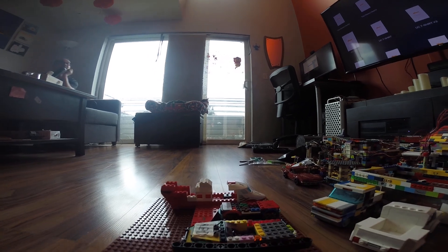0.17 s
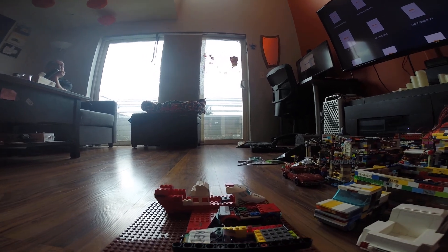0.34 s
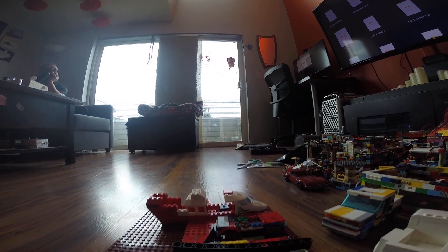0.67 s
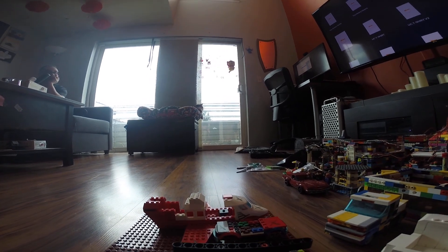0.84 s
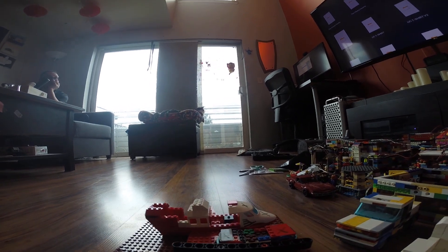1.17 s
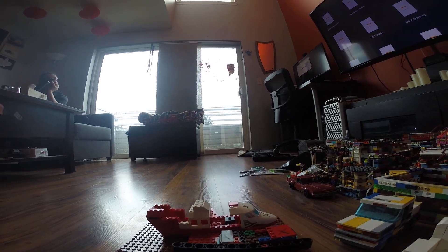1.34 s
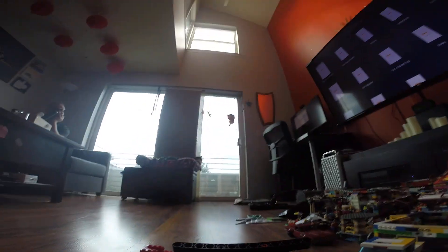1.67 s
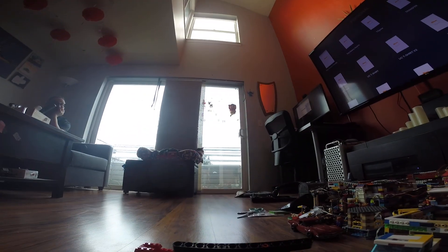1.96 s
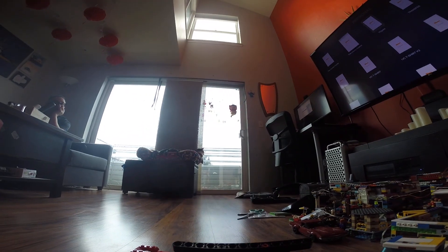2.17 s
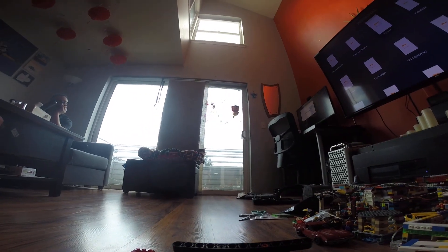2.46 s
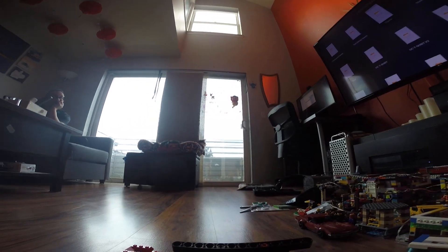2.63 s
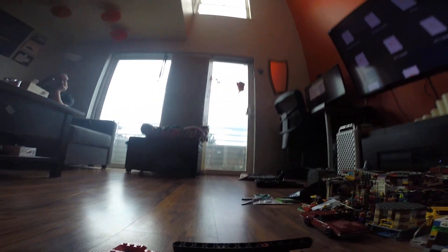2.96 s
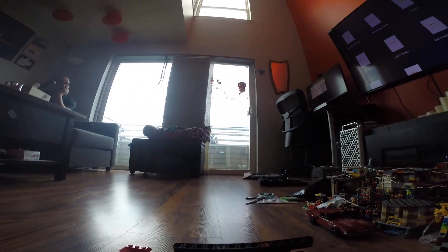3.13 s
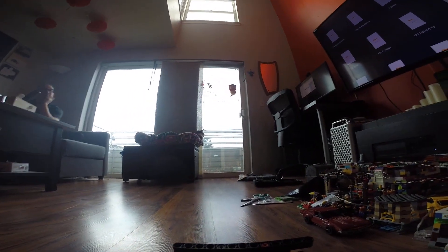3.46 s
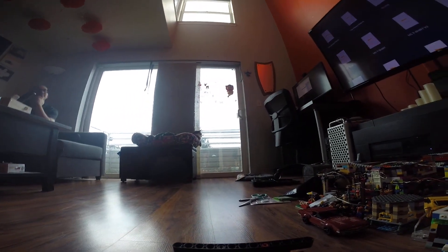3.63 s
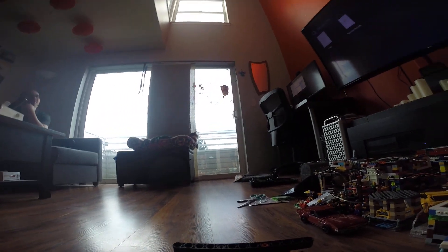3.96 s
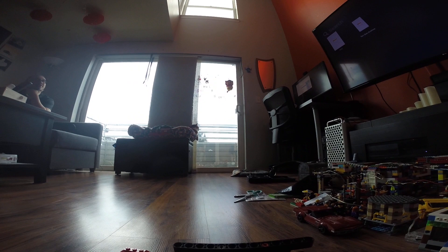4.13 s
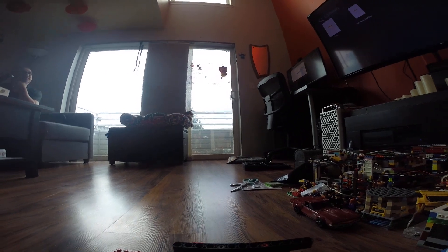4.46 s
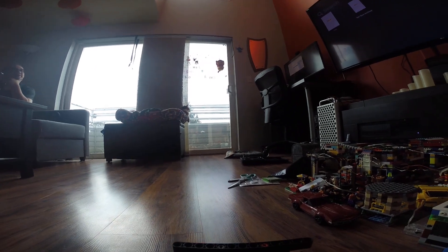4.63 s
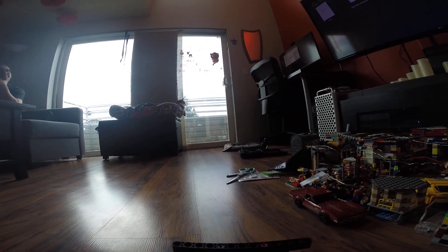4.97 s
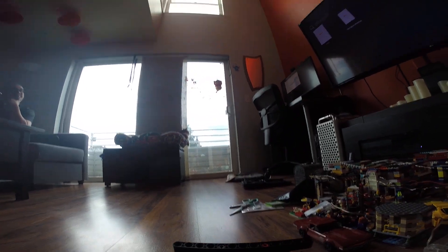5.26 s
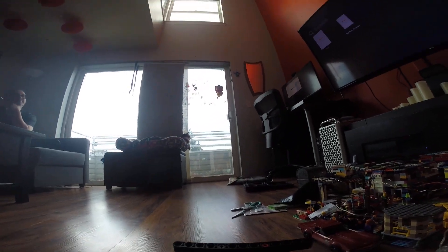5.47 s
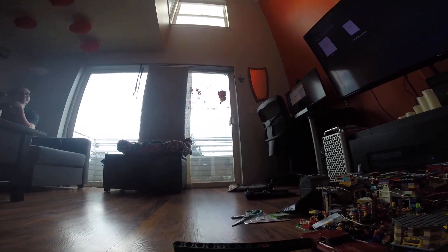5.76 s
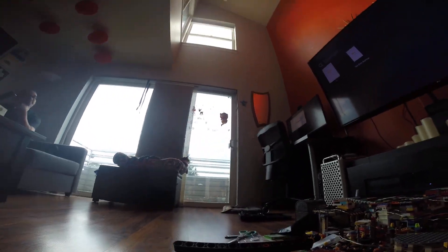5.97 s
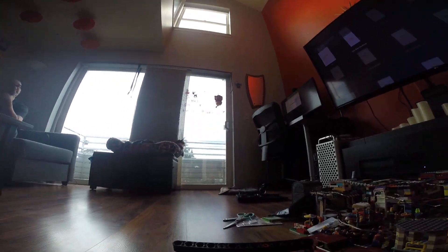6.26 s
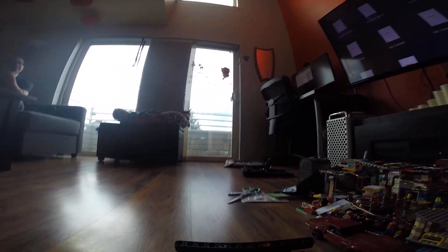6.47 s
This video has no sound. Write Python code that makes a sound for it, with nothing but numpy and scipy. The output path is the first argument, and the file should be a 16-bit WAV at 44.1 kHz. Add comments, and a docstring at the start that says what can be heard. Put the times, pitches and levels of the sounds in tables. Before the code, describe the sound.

Toy wheels rumble low on wooden boards while a plastic chassis knocks and loose bricks clack, with one hard jolt late.

```python
"""Wheels rumble on a wooden floor, very close: the microphone rides on a toy truck of plastic bricks,
pushed in fits and starts. Rolling sets the chassis rattling; the frame knocks, the deck thumps, loose
bricks clack and bounce, and now and then a wheel scrapes. The living room answers faintly over a low
hiss, and the recorder's limiter ducks after the hardest jolt, near the end."""
import sys
import numpy as np
from scipy import signal
from scipy.fft import rfft, irfft
from scipy.io import wavfile
from scipy.ndimage import uniform_filter1d, minimum_filter1d

SR = 44100
rng = np.random.default_rng(int(sys.argv[2]) if len(sys.argv) > 2 else 0)


def wav_record(signal):
    """Record a signal, one row per channel, as 16-bit PCM in the file named by sys.argv[1]."""
    frames = np.transpose(np.atleast_2d(signal))
    bounded = np.clip(frames, -1, 1)
    # unit amplitude maps onto the largest positive 16-bit level
    quanta = np.round(bounded * 32767).astype(np.int16)
    wavfile.write(sys.argv[1], SR, quanta)


N = 291060
TIME = np.arange(N) / SR
HIT_TIME = TIME[:SR // 4]

# resonances of the chassis: (frequency [Hz], width [Hz], relative level [dB])
CHASSIS_MODES = [(190, 65, -1.5), (330, 360, -4.5), (471, 277, 2.5), (654, 450, -0.5), (879, 260, -2),
                 (1081, 77, 3), (1141, 192, 0.5), (1568, 155, -3.5), (1946, 260, -12.5), (2315, 207, -6.5),
                 (2840, 200, -14.5), (3248, 168, -11.5), (3750, 1060, -29), (4290, 420, -28),
                 (4820, 600, -30.5), (6460, 1700, -52)]
# resonances of a loose brick: (frequency [Hz], width [Hz], relative level [dB])
BRICK_MODES = [(1000, 820, -1), (1444, 130, 3), (2041, 100, 10.5), (2448, 120, 9), (2700, 180, 0),
               (3330, 52, -2), (3794, 110, -7.5), (4450, 3900, -18), (7050, 2000, -25)]


def undb(db):
    """Decibels to gain."""
    return 10 ** (np.asarray(db) / 20)


def unit(x):
    """Scale to an rms of 1."""
    return x / np.sqrt(np.mean(x ** 2))


def add(track, s, hit, db):
    """Mix in a hit at time s, with its loudest 4 ms at the given level."""
    start = max(int(s * SR), 0)
    loudest = np.sqrt(uniform_filter1d(hit ** 2, size=176, mode="constant").max())
    track[start:start + len(hit)] += hit[:N - start] * undb(db) / loudest


def convolve(x, response):
    """Play x through a body or a room."""
    return signal.fftconvolve(x, response)[:len(x)]


def noise(spectrum):
    """Noise of rms 1, shaped by (frequency [Hz], relative level [dB]) points."""
    hz, db = np.transpose(spectrum)
    gain = undb(np.interp(np.log(np.fft.rfftfreq(N, 1 / SR) + 1), np.log(hz), db))
    return unit(irfft(rfft(rng.standard_normal(N)) * gain, N))


def waver(count, smooth_samples):
    """A smooth random wobble of rms 1."""
    return unit(uniform_filter1d(rng.standard_normal(count), size=smooth_samples))


def surge(s, hold_s, rise_s, settle_s):
    """An envelope that rises to 1 at time s, holds and dies away."""
    return np.exp(-np.maximum(s - TIME, 0) / rise_s - np.maximum(TIME - s - hold_s, 0) / settle_s)


def ring(modes, scatter_db=0, tilt_db=0, pitch=1):
    """Impulse response of a body; scatter weights its modes anew, as the place of contact does."""
    hz, width, db = np.transpose(modes)
    gain = width * undb(db + tilt_db + scatter_db * rng.standard_normal(len(hz)))
    sign = (-1) ** np.arange(len(hz))
    decays = np.exp(-np.pi * np.outer(width, HIT_TIME))
    tones = np.sin(2 * np.pi * np.outer(hz * pitch, HIT_TIME))
    return (sign * gain) @ (decays * tones)


def contacts(count, per_s, spread_db):
    """Random tiny collisions, most weak and a few strong."""
    size = undb(spread_db * np.minimum(rng.exponential(size=count), 4))
    return unit(size * rng.choice([-1, 1], count) * (rng.random(count) < per_s / SR))


def blow(chatter_s, chatter_gain, contact_hz=6000):
    """One push, then dying chatter as the joints settle; plastic gives, which rounds each contact."""
    settling = np.exp(-HIT_TIME / max(chatter_s, 1 / SR))
    force = chatter_gain * contacts(len(HIT_TIME), per_s=2300, spread_db=4.5) * settling
    force[0] += 1
    return signal.sosfilt(signal.butter(4, contact_hz, fs=SR, output="sos"), force)


def noise_floor(hiss_db=-62, whine_hz=13474, whine_db=-85):
    """A faint steady hiss and a thin whine lie behind everything."""
    # the hiss: (frequency [Hz], relative level [dB])
    spectrum = [(100, 19), (4000, 11), (6000, 4.5), (9000, 2), (15000, -9)]
    return noise(spectrum) * undb(hiss_db) + np.sin(2 * np.pi * whine_hz * TIME) * undb(whine_db)


def buzz(band_hz=(5600, 5760), pulses_per_s=24, db=-79):
    """A narrow high buzz from the electronics, pulsing evenly."""
    bandpass = signal.butter(2, band_hz, "bandpass", fs=SR, output="sos")
    band = signal.sosfilt(bandpass, rng.standard_normal(N))
    tone = np.cos(np.angle(signal.hilbert(band)))  # wandering pitch, even level
    pulses = np.maximum(np.sin(2 * np.pi * pulses_per_s * TIME), 0)
    return unit(tone * pulses) * undb(db)


def room(direct, t60_s=0.22, build_s=0.0026, gain_db=-20.5):
    """Walls and furniture reflect the truck, duller and far weaker than it is at the microphone."""
    t = TIME[:SR]
    tail = rng.standard_normal(SR) * undb(-60 * t / t60_s) * (1 - np.exp(-t / build_s))
    bandpass = signal.butter(1, [300, 5000], "bandpass", fs=SR, output="sos")
    tail = signal.sosfilt(bandpass, unit(tail) / np.sqrt(SR))
    return convolve(direct, tail) * undb(gain_db)


def high_hiss(s=5.87, db=-73):
    """A faint, thin high hiss swells just before the hardest jolt."""
    # the high hiss: (frequency [Hz], relative level [dB])
    spectrum = [(6500, -36), (9200, 10), (11500, -32)]
    return noise(spectrum) * undb(db) * surge(s, hold_s=0.115, rise_s=0.33, settle_s=0.0087)


def squeak(s=5.56, length_s=0.09, fundamental_hz=4340, db=-62):
    """A brief thin squeak, heard in its second and third harmonics; the pitch wavers."""
    hz = fundamental_hz * (1 + 0.0041 * waver(len(HIT_TIME), smooth_samples=100))
    phase = 2 * np.pi * np.cumsum(hz) / SR
    swell = np.sqrt(np.abs(np.sin(np.pi * np.minimum(HIT_TIME / length_s, 1))))
    out = np.zeros(N)
    add(out, s, swell * (np.sin(2 * phase) + 0.2 * np.sin(3 * phase)), db)
    return out


def scrapes(grit_db=2.0):
    """A wheel drags sideways on the boards, gripping and slipping unevenly."""
    # sideways drags: (time [s], hold [s], level [dB])
    drags = [(4.249, 0.045, -53), (5.284, 0.08, -53)]
    # wheel on wood: (frequency [Hz], relative level [dB])
    spectrum = [(500, -10), (1500, 8), (2400, 1.5), (5000, -12), (11000, -45)]
    grit = undb(grit_db * waver(N, smooth_samples=150))
    swell = sum(undb(db) * surge(s, hold_s, rise_s=0.032, settle_s=0.062) for s, hold_s, db in drags)
    return noise(spectrum) * grit * swell


def ticks():
    """A wheel drops over a seam or a crumb; the soft contact stirs only the lower chassis modes."""
    # wheel drops: (time [s], level [dB])
    drops = [(0.057, -37), (1.426, -45.5), (1.464, -41), (2.371, -39), (2.633, -35), (2.784, -39.5),
             (2.856, -45), (3.306, -46.5), (3.518, -45.5), (3.613, -40.5), (4.549, -37.5), (4.571, -36.5),
             (6.117, -40), (6.438, -36)]
    out = np.zeros(N)
    for s, db in drops:
        force = blow(chatter_s=0.004, chatter_gain=0.13, contact_hz=1480)
        add(out, s, convolve(force, ring(CHASSIS_MODES, scatter_db=3)), db)
    return out


def clacks(bounces=3, bounce_s=0.015, loss_db=3.5):
    """A loose brick drops against its neighbours and rattles to rest, each bounce losing more."""
    # first landings: (time [s], level [dB])
    landings = [(0.139, -27), (0.32, -29.5), (.542, -31), (0.8229, -25), (1.243, -25.5), (2.216, -35.5),
                (2.558, -38)]
    out = np.zeros(N)
    for s, db in landings:
        for k in range(bounces):
            brick = ring(BRICK_MODES, scatter_db=1.5)
            force = blow(chatter_s=0.0093, chatter_gain=0.12)
            add(out, s + k * bounce_s, convolve(force, brick), db - k ** 2 * loss_db)
    return out


def taps():
    """The axle knocks softly in its bearing."""
    # dull taps: (time [s], level [dB], pitch [ratio])
    hits = [(1.831, -25, 1.24), (5.647, -23, 0.92), (5.7, -24, 0.95), (5.7646, -25.5, 0.96),
            (5.813, -25.5, 0.99)]
    # resonances of the axle: (frequency [Hz], width [Hz], relative level [dB])
    axle_modes = [(487, 138, -2), (818, 73, -11.5), (1125, 53, -11.5)]
    out = np.zeros(N)
    for s, db, pitch in hits:
        force = blow(chatter_s=0, chatter_gain=0, contact_hz=3000)
        add(out, s, convolve(force, ring(axle_modes, scatter_db=3.5, pitch=pitch)), db)
    return out


def clunks():
    """A stiff hollow plastic part is struck in one clean blow, with hardly any chatter."""
    # hollow clunks: (time [s], level [dB], pitch [ratio])
    hits = [(3.0085, -15, 0.97), (3.122, -18, 1.07), (3.8332, -13.5, 0.998), (3.8363, -15.5, 0.91),
            (5.4945, -14, 1.36), (6.3556, -27, 1.16)]
    # resonances of the part: (frequency [Hz], width [Hz], relative level [dB])
    shell_modes = [(593, 89, -5), (866, 114, -9), (1173, 175, 1.5), (1640, 400, -10), (2360, 224, -12.5),
                   (3130, 330, -20.5), (4100, 480, -29)]
    out = np.zeros(N)
    for s, db, pitch in hits:
        force = blow(chatter_s=0.0022, chatter_gain=0.29)
        add(out, s, convolve(force, ring(shell_modes, pitch=pitch)), db)
    return out


def thumps():
    """The deck bobs on its wheels for a few cycles, right at the microphone."""
    # deck thumps: (time [s], level [dB], pitch [Hz])
    bobs = [(0.602, -19.5, 156), (1.229, -20, 114), (1.885, -21, 105), (1.912, -16, 54),
            (1.944, -18.5, 128), (2.672, -23, 62.6), (3.004, -21, 115), (3.088, -11.5, 87),
            (3.139, -20.5, 88), (4.128, -24.5, 145), (5.03, -18.5, 79), (5.411, -15.5, 116),
            (6.008, -3.5, 95.8), (6.011, -6.5, 183)]
    out = np.zeros(N)
    for s, db, hz in bobs:
        age = HIT_TIME * hz / 0.89
        swell = age * np.exp(-1.4 * age)  # peaks within the first cycle
        add(out, s, swell * np.sin(2 * np.pi * hz * HIT_TIME), db)
    return out


def knocks(chatter_halving_db=19):
    """Heavy blows favour the low chassis modes, sharp ones the high; a few ring a small metal part."""
    # knocks of the frame: (time [s], level [dB], brightness [dB per octave])
    hits = [(0.758, -30, -6.5), (1.2263, -29, -1), (1.235, -31, 0.5), (1.317, -34.5, 3), (1.524, -30, -4.5),
            (1.568, -34, -8), (1.633, -34.5, -2), (1.661, -30, 3.5), (1.686, -36.5, 6), (1.887, -20, 0),
            (1.894, -16, 2), (1.8999, -19, 0), (1.908, -31, 4.5), (1.9192, -22, -1), (1.941, -33, 9),
            (2.682, -35, -3), (2.6949, -21.5, 4), (2.722, -31.5, -3), (3.003, -15, -1.5),
            (3.0082, -14.5, 2), (3.0234, -23.5, 16), (3.05, -31.5, -1.5), (3.083, -30, 3),
            (3.099, -24.5, -1), (3.108, -24, 1.5), (3.122, -23, 2.5), (3.129, -24, 2.5), (3.146, -37, 3),
            (3.189, -32.5, 0.5), (3.627, -38, -2.5), (3.718, -34.5, -1), (3.732, -39, 1),
            (4.149, -49.5, 14), (4.387, -34, 3.5), (4.589, -44.5, 4), (4.901, -31, -2.5), (4.916, -28, 4.5),
            (4.933, -26, 7.5), (4.9689, -21, 10.5), (5.025, -28.5, -4), (5.043, -26.5, 2),
            (5.081, -37.5, 4.5), (5.131, -41.5, 3), (5.339, -34, -1.5), (5.374, -37.5, 13), (5.389, -36, 8),
            (5.489, -35, 7), (5.4995, -13, 3), (5.547, -31.5, 9), (5.648, -31.5, 6), (5.96, -27.5, -4.5),
            (5.984, -22.5, -4), (6.011, 1.5, 1.5), (6.021, -8.5, 4.5), (6.037, -20, 4)]
    # pings of the metal part: (time [s], level [dB])
    pings = [(3.836, -43.5), (5.496, -39.5), (6.01, -35)]
    # its resonances: (frequency [Hz], width [Hz], relative level [dB])
    metal_modes = [(1093, 14, -9), (1814, 7.5, 0)]
    octaves = np.log2(np.transpose(CHASSIS_MODES)[0])
    out = np.zeros(N)
    for s, db, brightness in hits:
        # a hard knock seats the joints at once, a light one leaves them chattering
        chatter_s = 0.0052 * 2 ** ((-28 - db) / chatter_halving_db)
        body = ring(CHASSIS_MODES, scatter_db=5.5, tilt_db=brightness * octaves)
        add(out, s, convolve(blow(chatter_s, chatter_gain=0.14), body), db)
    for s, db in pings:
        add(out, s, ring(metal_modes), db)
    return out


def ride(rattle_trim_db=-2.5):
    """Gains of rumble and rattle in rolling, then in shoves; the bricks settle before the wheels."""
    # steady rolling between bumps: (time [s], rumble level [dB], relative rattle level [dB])
    steady = [(0.0, -30, -42.5), (0.22, -32, -41), (1.12, -45.5, -56), (1.4, -39.5, -55),
              (1.75, -44, -42.5), (2.02, -38, -53.5), (2.43, -39, -51.5), (3.12, -53, -50.5),
              (3.269, -36.5, -53.5), (4.03, -44.5, -58), (4.32, -40, -55), (4.72, -46, -51.5),
              (5.33, -45.5, -55.5), (5.5, -34.5, -45), (5.97, -46.5, -50), (6.1, -36.5, -58.5),
              (6.3, -49.5, -56.5), (6.6, -38, -43.5)]
    # shoves that jolt the truck: (time [s], hold [s], rumble level [dB], relative rattle level [dB])
    shoves = [(0.766, 0.061, -29, -47.5), (1.203, 0.14, -29, -49.5), (1.547, 0.14, -25.5, -37.5),
              (1.906, 0.013, -19.5, -29.5), (2.613, 0.16, -29.5, -63), (3.006, 0.027, -21, -30),
              (3.098, 0.038, -16.5, -30), (4.074, 0.19, -37.5, -65), (4.963, 0.14, -28, -47),
              (5.305, 0.097, -38, -41.5), (5.494, 0.037, -26, -37), (5.926, 0.069, -34, -42.5),
              (6.01, 0.03, -14.5, -20.5)]
    times, rumble_db, rattle_db = np.transpose(steady)
    roll = undb(np.interp(TIME, times, rumble_db))
    stir = undb(np.interp(TIME, times, rattle_db) + rattle_trim_db)
    heave, jolt = np.zeros(N), np.zeros(N)
    for s, hold_s, wheel_db, chassis_db in shoves:
        heave = np.hypot(heave, undb(wheel_db) * surge(s, hold_s, rise_s=0.004, settle_s=0.054))
        jolt = np.hypot(jolt, undb(chassis_db) * surge(s, hold_s, rise_s=0.0047, settle_s=0.022))
    return roll, stir, heave, jolt


def rolling(grit_db=3.5):
    """Wheels rumble and whirr on the boards; a shove makes the deck boom and the chassis clatter."""
    # low rumble of wheels and deck: (frequency [Hz], relative level [dB])
    rumble_spectrum = [(15, -10.5), (28, 6), (42, 3.5), (72, 5.5), (92, -5.5), (125, 2.5), (168, -8),
                       (215, -12.5), (300, -21.5), (500, -34.5), (1000, -90.5)]
    # whirr of the wheels: (frequency [Hz], relative level [dB])
    whirr_spectrum = [(200, -2.5), (750, 7), (1130, -3.5), (1800, -5), (2350, -7.5), (3350, -13.5),
                      (4300, -31), (7000, -59.5)]
    rumble, boom = noise(rumble_spectrum), noise(rumble_spectrum)
    shake = unit(uniform_filter1d(np.abs(boom), size=400))  # the deck's motion drives the collisions
    frame = np.zeros(N)
    for wheel in range(4):
        bumps = shake * contacts(N, per_s=90, spread_db=3)
        frame += convolve(bumps, ring(CHASSIS_MODES, scatter_db=2))
    frame = unit(frame)
    jostle = shake * contacts(N, per_s=500, spread_db=3)
    bricks = unit(convolve(jostle, ring(BRICK_MODES)))
    whirr = unit(noise(whirr_spectrum) * undb(grit_db * waver(N, smooth_samples=350)))
    rattle = frame * undb(-4.5) + bricks * undb(-8.5) + whirr * undb(-3)
    clatter = frame * undb(-3) + bricks * undb(-8) + whirr * undb(-10)
    roll, stir, heave, jolt = ride()
    return rumble * roll + rattle * stir + boom * heave + clatter * jolt


def scene():
    """One microphone on the truck: its own noises up close, the room and the noise floor far behind."""
    truck = rolling() + knocks() + ticks() + clunks() + clacks() + taps() + thumps() + scrapes()
    direct = truck + squeak() + high_hiss()
    return (direct + room(direct) + noise_floor() + buzz())[None]


def record(dry, ceiling_db=1, release_db_per_s=16, top_hz=14900):
    """A look-ahead limiter ducks at once and recovers slowly; overshoots clip; the top is cut."""
    over_db = np.maximum(20 * np.log10(np.abs(dry[0]) + 1e-9) - ceiling_db, 0)
    recovery = release_db_per_s * TIME
    duck_db = recovery - np.maximum.accumulate(over_db + recovery)
    duck_db = uniform_filter1d(minimum_filter1d(duck_db, size=220), size=220)  # eases in 5 ms ahead
    clipped = np.clip(dry * undb(duck_db), -1, 1)
    return signal.sosfilt(signal.ellip(8, 0.2, 70, top_hz, fs=SR, output="sos"), clipped)


dry = scene()
out = record(dry)
wav_record(out)
```